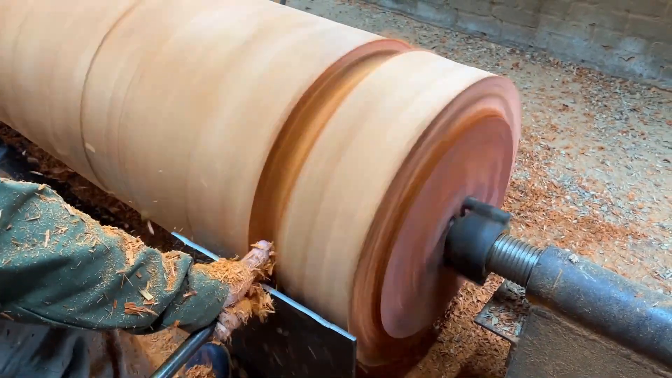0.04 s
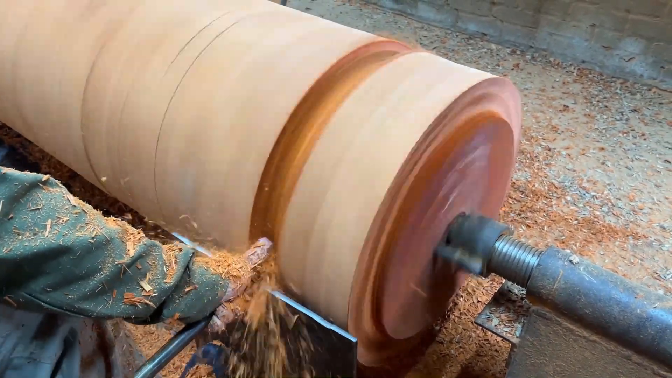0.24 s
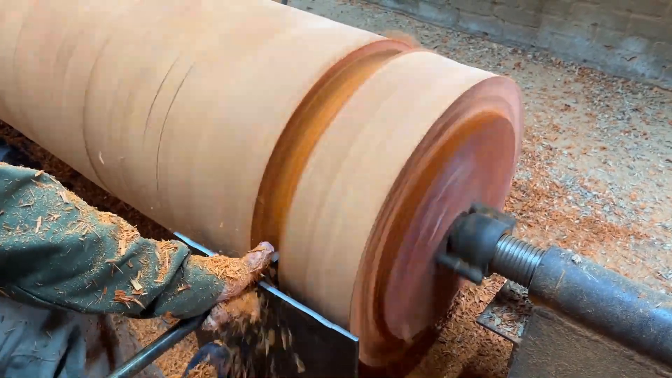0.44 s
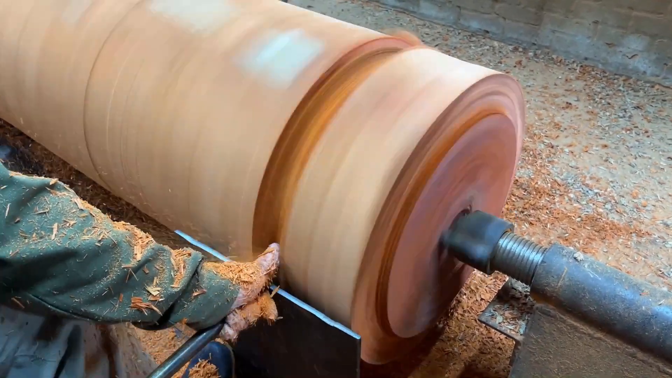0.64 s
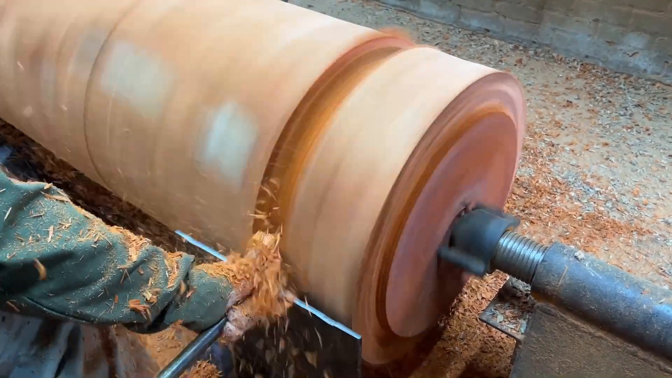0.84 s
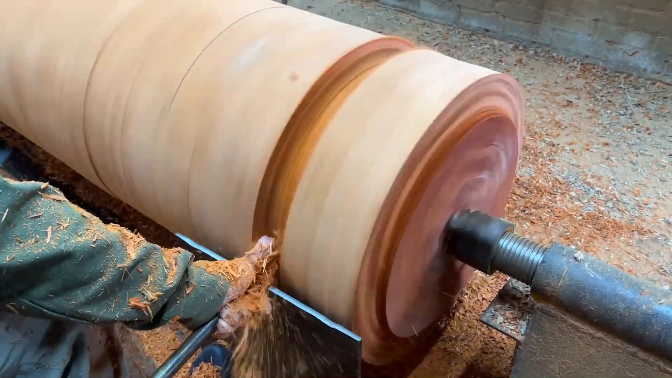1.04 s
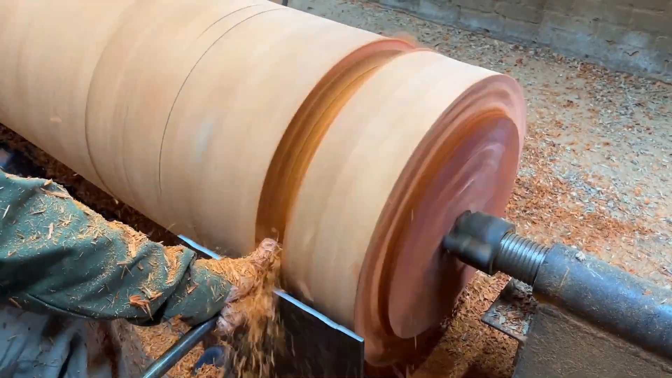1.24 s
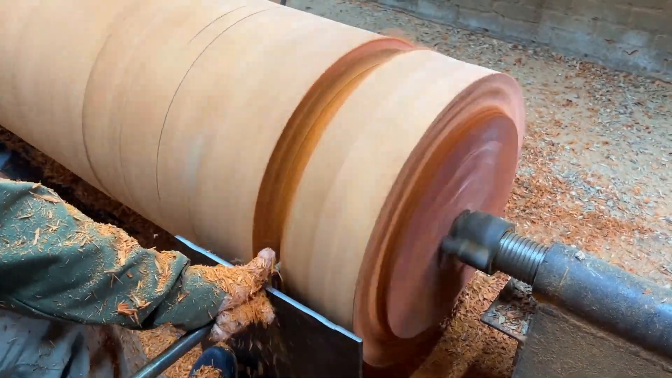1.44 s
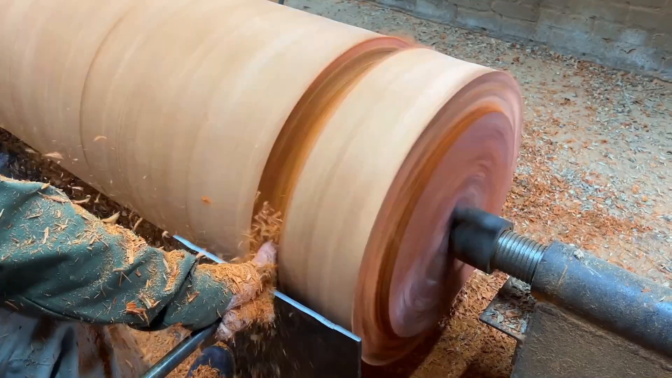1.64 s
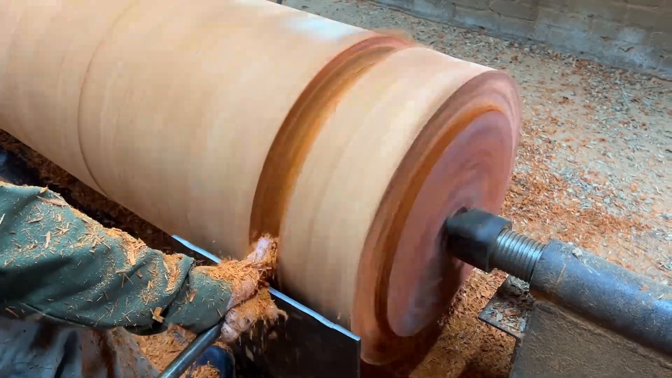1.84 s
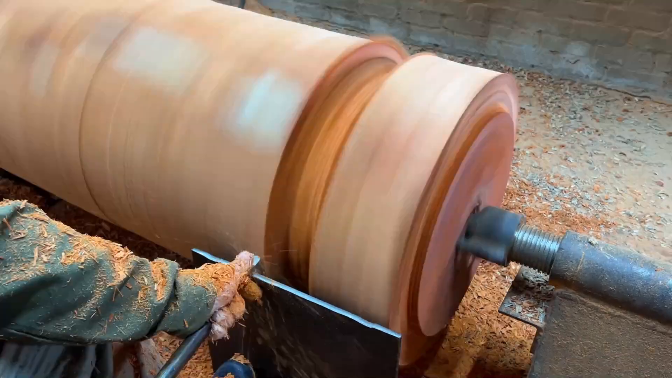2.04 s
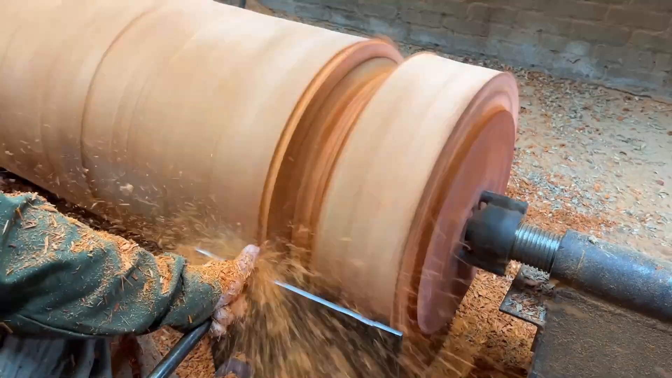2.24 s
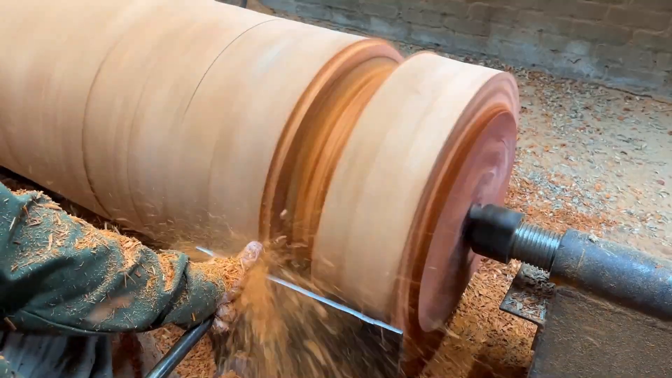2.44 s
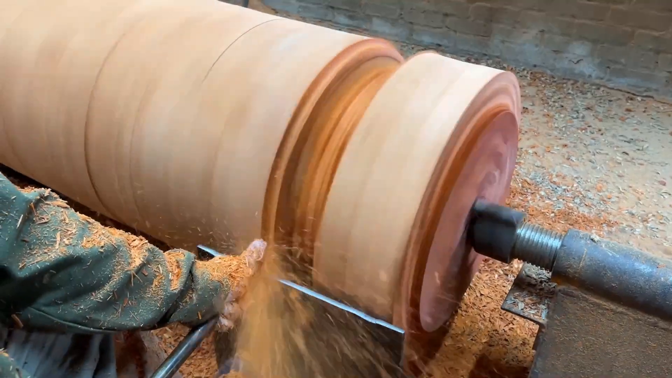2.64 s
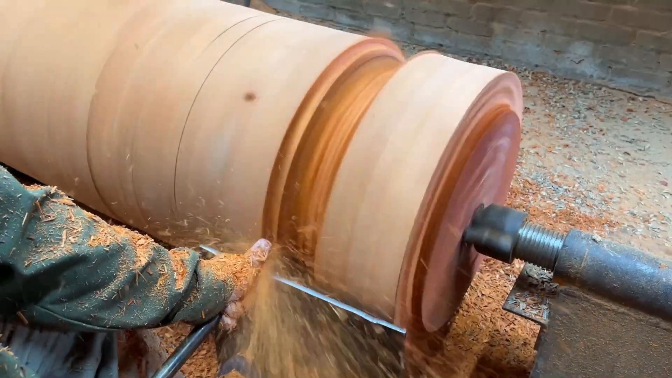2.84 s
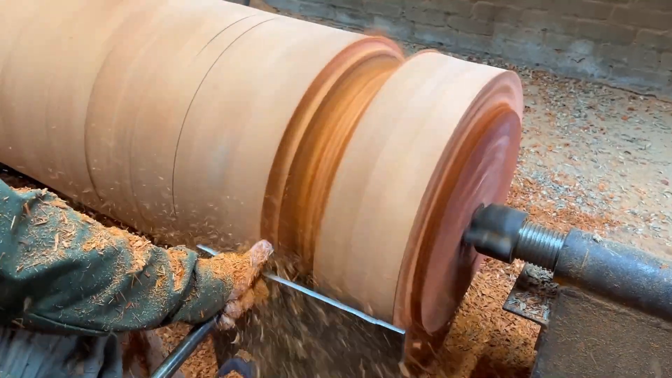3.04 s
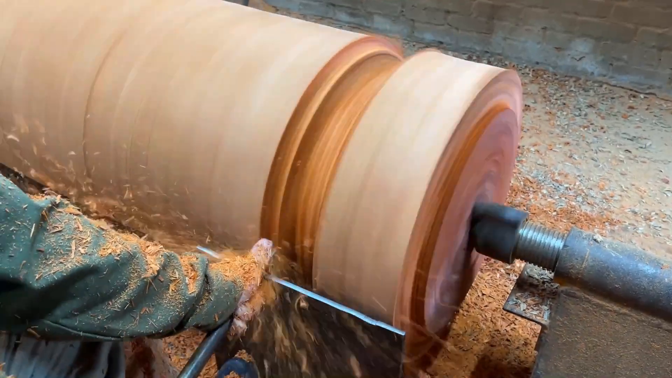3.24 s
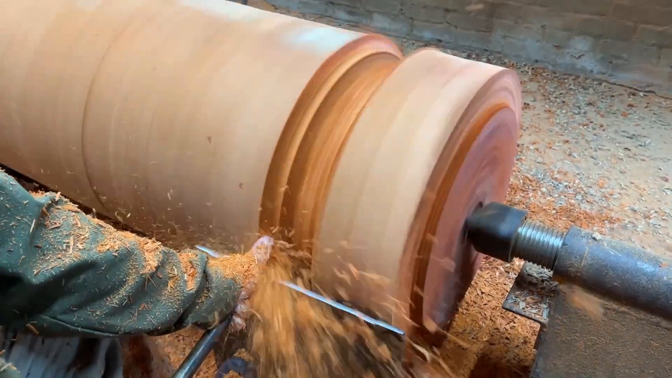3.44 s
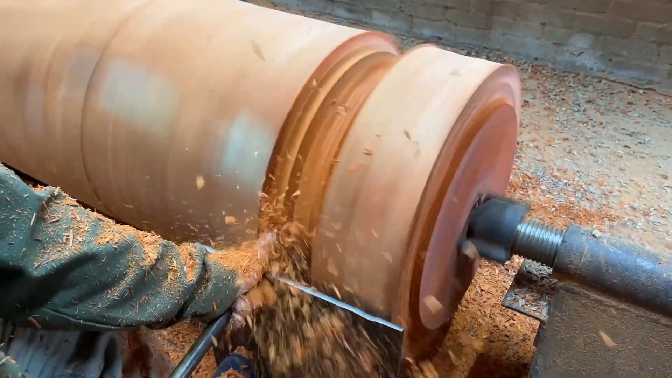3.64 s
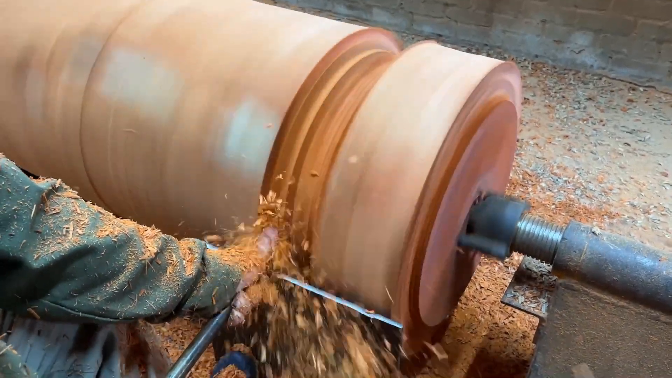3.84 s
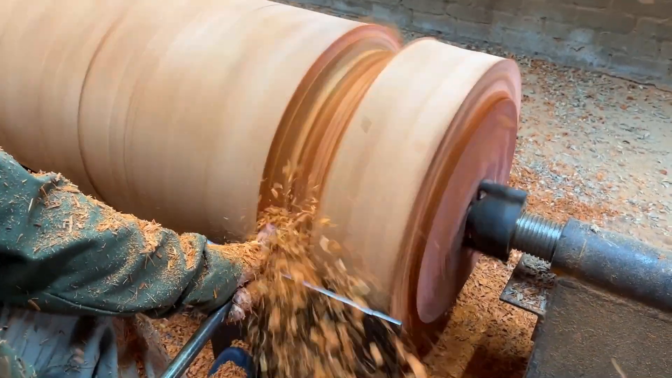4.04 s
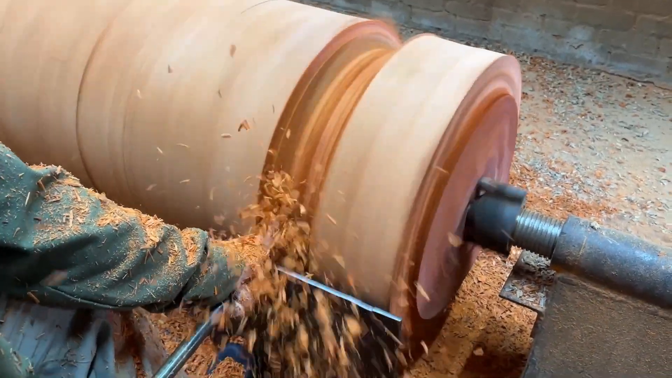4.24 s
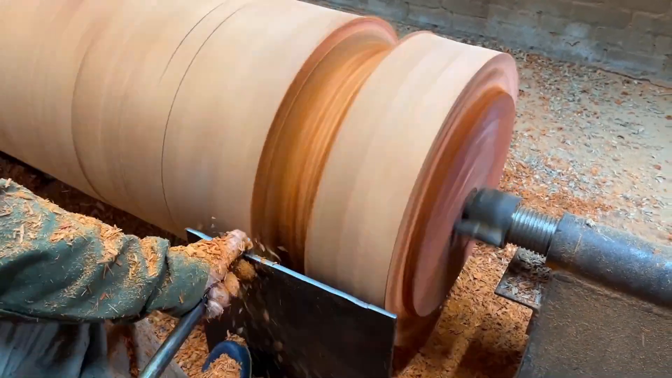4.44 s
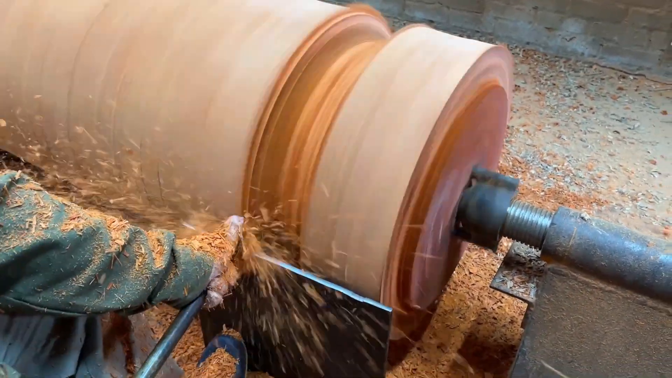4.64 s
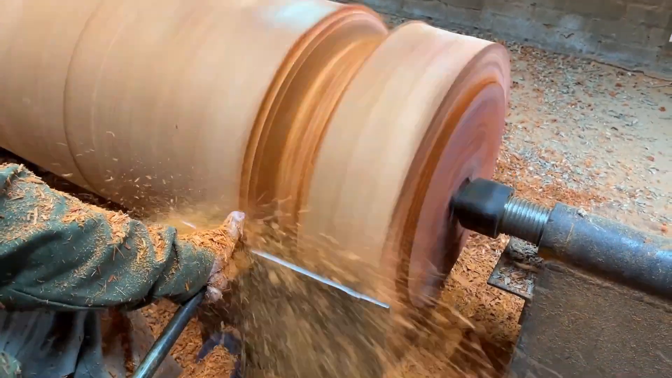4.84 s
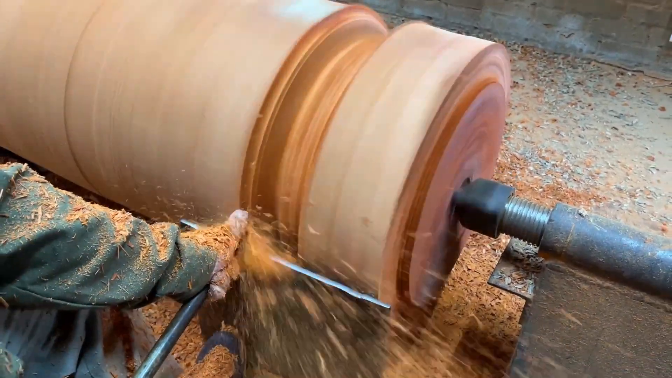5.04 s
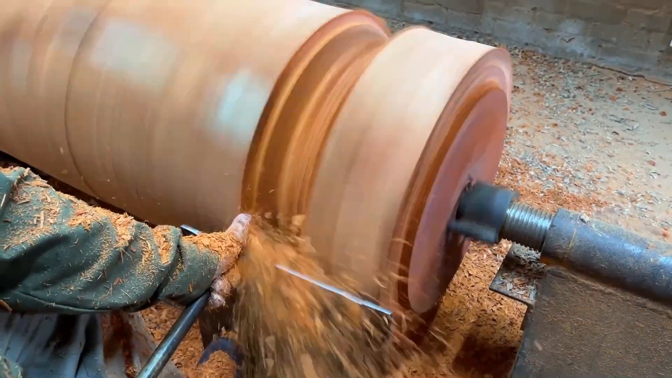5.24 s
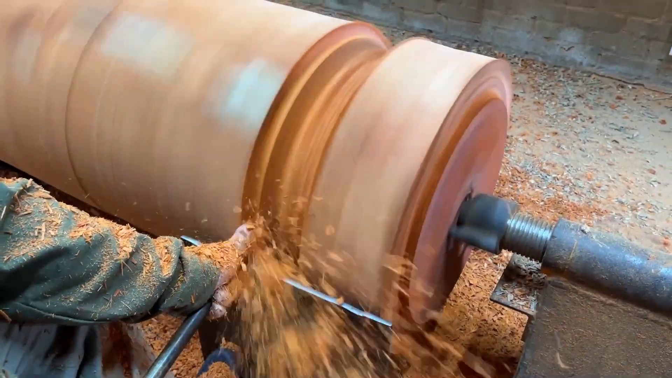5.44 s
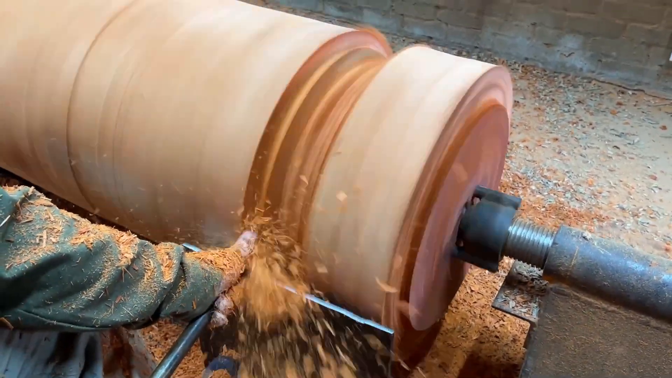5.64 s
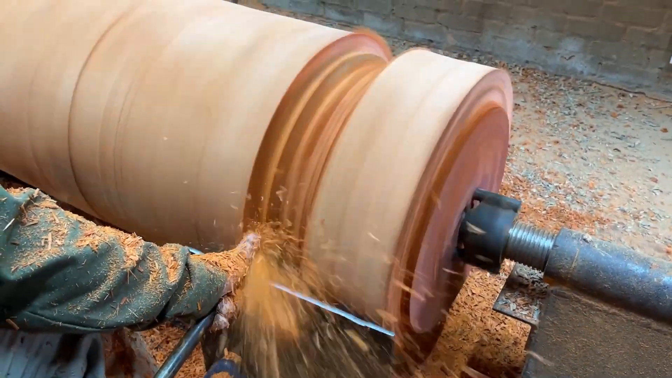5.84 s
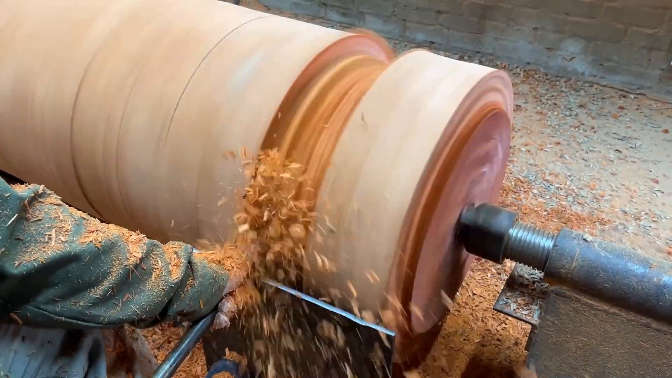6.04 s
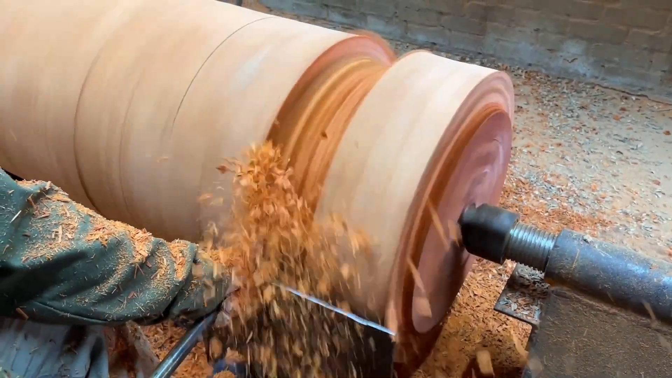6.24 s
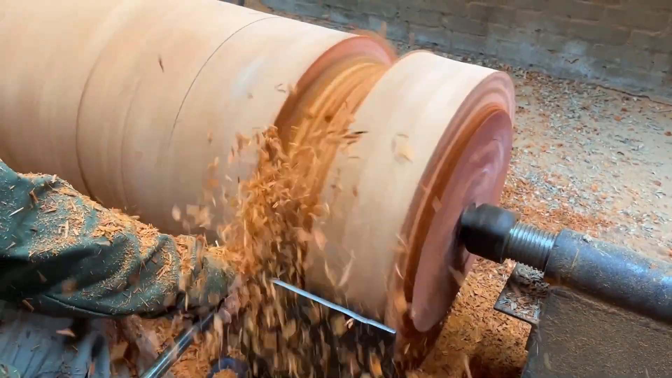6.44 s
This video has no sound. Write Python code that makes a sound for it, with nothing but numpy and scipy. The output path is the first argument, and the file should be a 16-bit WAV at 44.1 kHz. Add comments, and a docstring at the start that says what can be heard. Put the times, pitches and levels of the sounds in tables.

```python
"""A steel tool cuts a groove in a big log spinning on a lathe, heard from close by in a workshop.
Over the rumble of the lathe come five short, rough bites, with knocks and thin squeals from the bevel.
The level dips briefly. Three long cuts follow, the shaving's hiss falling in pitch as it widens.
All along, tearing fibres ring the tool and the log, and the cut throbs as the end grain comes round."""
import sys
import numpy as np
from scipy import signal
from scipy.fft import rfft, irfft, next_fast_len
from scipy.io import wavfile
from scipy.ndimage import uniform_filter1d

SR = 44100
rng = np.random.default_rng(int(sys.argv[2]) if len(sys.argv) > 2 else 0)


def generate_wav(signal):
    """Clip the signal to [-1, 1] and save it as 16-bit WAV at the path in sys.argv[1]."""
    frames = np.transpose(np.atleast_2d(signal))
    scaled = np.clip(frames, -1, 1) * 32767
    pcm = np.round(scaled).astype(np.int16)
    wavfile.write(sys.argv[1], SR, pcm)


N = 287091
TIME = np.arange(N) / SR
SIZE = next_fast_len(N + SR // 2)
FREQS = np.maximum(np.arange(SIZE // 2 + 1) * SR / SIZE, 1)

# tone of the room's scattered tail: (frequency [Hz], level [dB])
ROOM_EQ = [(60, -15), (300, -19), (700, -7), (1400, -15.5), (3000, -3.5), (6000, -6), (15000, -6.5)]
# stereo image: (frequency [Hz], left phase lead [rad], left over right [dB])
STEREO_IMAGE = [(60, -1.05, 0), (304, -0.13, -2.5), (690, -0.49, 0), (1530, -0.76, -1.5), (2600, -1.16, 1),
                (5440, 2.1, 1), (8450, 1.16, 0.5), (9900, 1.61, 1.5), (12800, 1.25, -1), (13400, -1.6, 2)]
# bearing rumble: (frequency [Hz], level [dB])
LATHE_EQ = [(25, -25), (70, -19), (130, -2), (190, -1), (350, -2), (700, -4), (1300, -4), (2500, -9.5),
            (5000, -12.5), (6000, -16), (16000, -31)]
# tempo of the throb: (time [s], end-grain passes [1/s])
PASS_RATE = [(0, 16.2), (1.5, 16.2), (1.8, 15.45), (3.05, 15.45), (3.3, 16.25), (3.9, 15.6), (4.8, 15.45)]
# the rubbing bevel sings: (start [s], end [s], pitch [Hz], width [Hz], level [dB])
BEVEL_SQUEALS = [(0, .62, 2863, 10, -51), (.79, 1.01, 2863, 10, -45), (.98, 1.3, 2863, 8, -49),
                 (1.52, 2.11, 2863, 8, -47), (1.05, 1.2, 5350, 60, -48), (1.44, 1.62, 5400, 50, -47),
                 (1.85, 2.02, 4020, 40, -46), (2.98, 3.19, 2830, 30, -49), (3.1, 3.19, 4500, 30, -54),
                 (3.1, 3.19, 7000, 50, -55), (3.235, 3.33, 4550, 50, -39), (3.24, 3.33, 7050, 150, -37.5),
                 (3.49, 3.63, 2795, 26, -40), (3.64, 3.71, 2795, 26, -40), (3.73, 3.81, 2795, 26, -41),
                 (3.89, 4.02, 2795, 26, -40), (4.03, 4.44, 2795, 35, -45), (6.05, 6.5, 2795, 35, -44),
                 (4.2, 4.45, 5550, 350, -39), (4.41, 4.54, 5370, 25, -50), (4.43, 4.53, 4480, 30, -55)]
# the tool knocks on the log: (time [s], peak [dB])
TOOL_KNOCKS = [(0.367, -61), (0.723, -34), (0.897, -29.5), (0.983, -24.5), (0.992, -30), (1.033, -34),
               (1.147, -35), (1.711, -52), (1.779, -27), (1.785, -48), (1.828, -47), (2.059, -30),
               (2.073, -39), (2.087, -35)]
# the log's low boom and midrange rasp: (pitch [Hz], width [Hz], level [dB])
LOG_BOOM_MODES = [(239, 10, -8), (309, 26, 7.5), (360, 15, 2)]
LOG_RASP_MODES = [(803, 27, -12.5), (1185, 75, 2.5), (1332, 53, 8.5), (1544, 53, -3.5), (2015, 50, -5)]
# broad woody noise under the boom: (frequency [Hz], level [dB])
LOG_EQ = [(25, -16), (55, -32), (90, -11.5), (160, -3.5), (300, 7), (550, -5.5), (900, 2.5), (2000, -4),
          (6000, -63)]
# hard spots in the wood accent the rasp: (time [s], boost [dB])
RASP_ACCENTS = [(.42, 4), (1.41, 7), (3.445, 14.5), (5.378, 11), (5.511, 12.5), (5.578, 8)]
# the tool's ring in bites and in long cuts: (pitch [Hz], width [Hz], level over the tearing [dB])
TOOL_BITE_MODES = [(2863, 22, 9), (3430, 160, 5), (3690, 50, 2), (4010, 110, 4), (5400, 200, 0),
                   (5940, 170, 1), (6440, 55, 0), (8250, 200, -3), (8740, 150, -1), (9950, 150, 0),
                   (13250, 100, 0), (14250, 200, -1)]
TOOL_CUT_MODES = [(2790, 80, -2), (3880, 220, -2), (4700, 150, -7), (6480, 130, -4), (7200, 200, -4),
                  (8010, 80, 1), (8805, 80, 2), (9447, 45, -3), (9620, 45, -3), (10460, 160, -2),
                  (12439, 60, 1), (12908, 45, -4), (13249, 65, 9), (13642, 45, -4), (14012, 45, -6),
                  (14919, 45, -3), (15343, 45, -5)]
# tone of the tearing in bites and in long cuts: (frequency [Hz], level [dB])
BITE_EQ = [(40, -5.5), (150, -8), (500, -4.5), (1000, -11), (2500, -1.5), (3500, 3), (4600, -1.5),
           (6000, 6), (7500, 8), (9500, 7), (12000, 6.5), (16000, 0)]
CUT_EQ = [(40, -13), (150, -14.5), (500, -10), (1000, -13.5), (2400, -9), (3500, -9), (4600, -5.5),
          (6000, -1.5), (7500, -7.5), (9500, -7), (12000, -3.5), (16000, -4.5)]
# short bites: (entry [s], deepest point [s], rasp peak [s], exit [s], attack [dB/s],
# tearing [dB], rasp [dB], boom [dB], shaving's hiss [dB], coarse chips [dB])
SHORT_BITES = [(-.2, -0.004, 0.089, 0.11, 500, -24.5, -43.5, -41.5, 12, -17),
               (0.195, 0.45, 0.56, 0.53, 1000, -26, -31, -40.5, -24, 11.5),
               (0.678, 0.934, 0.94, 1.005, 500, -22, -35.5, -40.5, 3, -18),
               (1.09, 1.198, 1.41, 1.479, 380, -23.5, -32.5, -39, 9, 15),
               (1.57, 1.778, 1.75, 1.965, 350, -23, -33.5, -37.5, 13, 15)]
# long cuts: (entry [s], exit [s], attack [dB/s], shaving's first width [0-1], last width [0-1],
# growth curve [exponent], rasp [dB], boom [dB])
LONG_CUTS = [(2.175, 3.105, 444, 0.04, 0.31, 2.24, -42.5, -49),
             (3.254, 4.414, 1402, 0.28, 0.94, 0.66, -42, -49),
             (4.596, 6.513, 950, .03, 0.96, 1.205, -43.5, -50)]
# push on the tool, one envelope per long cut: (time [s], tearing level [dB])
PUSH_ENVELOPES = [
    [(2.18, -33), (2.306, -32), (2.522, -29.5), (2.532, -26.5), (2.818, -26), (2.828, -27.5),
     (3.084, -25.5), (3.09, -29)],
    [(3.26, -26.5), (3.308, -24.5), (3.348, -31.5), (3.416, -25.5), (3.938, -26.5), (4.108, -28.5),
     (4.268, -25.5), (4.41, -28.5)],
    [(4.61, -33), (4.81, -27.5), (5.114, -24.5), (5.44, -28), (5.562, -25), (5.994, -30.5), (6.026, -27),
     (6.5, -28.5)],
]

# the shaving's resonances sweep down: (pitch when narrowest [Hz], pitch when widest [Hz])
LOWER_HZ, UPPER_HZ, COARSE_HZ = (11330, 7760), (16820, 7840), (9900, 4910)
# each speaks best at one width: (best width [0-1], level there [dB], loss at 0.5 off that width [dB])
LOWER_VOICE, UPPER_VOICE, COARSE_VOICE = (0.68, 7.86, 11.5), (0.14, 13.2, 77), (0.95, 17, 39)
CUTOFF_HZ = 15850


def from_db(db):
    """Decibels to gain."""
    return 10 ** (np.asarray(db) / 20)


def rms_one(x):
    """Scale to unit power."""
    return x / np.sqrt(np.mean(np.abs(x) ** 2) + 1e-20)


def envelope(rows):
    """A breakpoint curve at every sample."""
    return np.interp(TIME, *np.transpose(rows))


def in_frequency(rows):
    """Each column of a table at every frequency."""
    hz, *columns = np.transpose(rows)
    return [np.interp(np.log(FREQS), np.log(hz), c) for c in columns]


def colour(eq):
    """Frequency response of an EQ curve."""
    return from_db(in_frequency(eq)[0])


def filtered(x, response):
    """Pass a sound through a frequency response."""
    return irfft(rfft(x, SIZE) * response, SIZE)[..., :N]


def resonance(hz, width_hz):
    """Response of one damped mode, 1 at its peak."""
    return 1 / (1 + 1j * (FREQS ** 2 - hz ** 2) / (FREQS * width_hz))


def body(modes):
    """Response of a bank of modes."""
    return sum(from_db(db) * resonance(hz, width) for hz, width, db in modes)


def drift(rate_hz):
    """Smooth random modulation at unit power."""
    return rms_one(filtered(rng.standard_normal(N), 1 / (1 + (FREQS / rate_hz) ** 2)))


def levelled(x, window=2200):
    """Trim the top off a noise and ride its gain to hold unit power."""
    x = filtered(x, FREQS < CUTOFF_HZ)
    return x / np.sqrt(uniform_filter1d(x * x, window) + 1e-12)


def workshop(x, t60=0.071):
    """Direct sound reaches the two ears out of step; near surfaces add a short scattered tail."""
    lead, balance_db = in_frequency(STEREO_IMAGE)
    sides = np.array([[1], [-1]])
    decay = from_db(-60 * np.minimum(TIME / t60, 4))
    tail = rng.standard_normal((2, N)) * decay * (TIME > .002)
    response = np.exp(.5j * sides * lead) + colour(ROOM_EQ) * rms_one(rfft(tail, SIZE))
    return filtered(x, response * from_db(sides * balance_db / 2))


def lathe():
    """The bed: bearings rumble and the motor hums."""
    hum = from_db(-6) * resonance(220, 18)
    noise = rng.standard_normal(N) + from_db(-15) * rng.standard_normal((2, N))
    return from_db(-52) * rms_one(filtered(noise, colour(LATHE_EQ) + hum))


def squeals():
    """Rubbing holds a steel mode in steady vibration; its pitch wavers within the mode's width."""
    out = np.zeros(N)
    for start, end, hz, width_hz, db in BEVEL_SQUEALS:
        span = slice(int(start * SR), int(end * SR))
        size = len(out[span])
        pole = np.exp((-np.pi * width_hz + 2j * np.pi * hz) / SR)
        ring = rms_one(signal.lfilter([1], [1, -pole], rng.standard_normal(SR)))
        held = ring.real / np.hypot(np.abs(ring), .4)  # soft limiting
        out[span] += from_db(db) * rms_one(held[-size:]) * signal.windows.tukey(size, .4)
    return out


def end_grain(width, boom_db, first_pass_s=.056):
    """End grain resists on each pass: a throb and a thump, strongest under a narrow shaving."""
    rate = envelope(PASS_RATE)
    passes = np.cumsum(rate) / SR - first_pass_s * rate[0]
    angle = 2 * np.pi * passes
    narrow = np.exp(-((width - 0.25) / 0.13) ** 2)
    pulse = np.cos(angle) + 0.18 * np.cos(2 * angle) - .1
    throb = (0.42 + 1.5 * narrow) * pulse
    triggers = np.diff(np.floor(passes), prepend=np.floor(passes[0]))
    thumps = triggers * from_db(boom_db + 10 * narrow + 2 * drift(7.2))
    return throb, thumps


def knocks(thumps):
    """The tool bounces on high spots and on the end grain; each soft blow thumps the log's low modes."""
    blows = thumps.copy()
    for s, db in TOOL_KNOCKS:
        blows[int(s * SR)] += from_db(db)
    low_modes = body(LOG_BOOM_MODES) + from_db(9) * resonance(280, 91)
    response = low_modes * resonance(220, 330)
    return filtered(blows, response / np.abs(irfft(response)).max())


def fractures(per_s, spread_db, sides_db):
    """Fibres snap at random, most faintly and a few hard, in the centre, left and right."""
    sizes = from_db(spread_db * np.minimum(rng.exponential(1, (3, N)), 5))
    snaps = sizes * rng.choice([-1, 1], (3, N)) * (rng.random((3, N)) < per_s / SR)
    return rms_one(snaps[0] + from_db(sides_db) * snaps[1:])


def log_body(clumps, rasp_db, boom_db):
    """The cutting force shakes the log: a midrange rasp over a low boom."""
    shake = fractures(per_s=5000, spread_db=2.5, sides_db=-9.5) * clumps
    accent_db = sum(db * np.exp(-((TIME - s) / 0.0079) ** 2) for s, db in RASP_ACCENTS)
    rasp = levelled(filtered(shake, body(LOG_RASP_MODES)))
    boom = levelled(filtered(shake, body(LOG_BOOM_MODES) + from_db(-5) * colour(LOG_EQ)))
    return rasp * from_db(rasp_db + accent_db - 2) + boom * from_db(boom_db + 1)


def contact(enters, leaves, attack_db_per_s, release_db_per_s=500, log_share=.75):
    """The edge sinks in, holds and is drawn out: the tool's fade and the log's gentler one, in dB."""
    attack_db = -attack_db_per_s * np.maximum(enters - TIME, 0)
    fade_db = attack_db - release_db_per_s * np.maximum(TIME - leaves, 0)
    return fade_db, log_share * fade_db


def bite(enters, deepest, rasp_peak, leaves, attack, tear_db, rasp_db, boom_db, hiss_db, coarse_db):
    """A short bite swells to its deepest point and eases; its shaving is wide throughout."""
    fade_db, log_fade_db = contact(enters, leaves, attack)
    shallow = np.interp(TIME, [enters, deepest, leaves], [1, 0, 1]) ** 1.33
    smooth = np.interp(TIME, [enters, rasp_peak, leaves], [1, 0, 1]) ** 2.1
    rub_tear_db, rub_boom_db = -54, -51.5  # the bevel still rubs between bites
    return dict(
        contact_db=fade_db, width=0.85,
        tear_db=np.maximum(tear_db - 12 * shallow + fade_db, rub_tear_db),
        rasp_db=rasp_db - 13.5 * smooth + log_fade_db,
        boom_db=np.maximum(boom_db - 6 * shallow + log_fade_db, rub_boom_db),
        lower_db=hiss_db - 14 * shallow, upper_db=-36, coarse_db=coarse_db)


def voice_db(width, best_width, top_db, loss_db):
    """A resonance of the shaving fades on either side of its best width."""
    return top_db - loss_db * (2 * (width - best_width)) ** 2


def long_cut(push, enters, leaves, attack, first_width, last_width, curve, rasp_db, boom_db):
    """In a long cut the shaving widens and recolours the hiss; the rasp grows and the boom thins."""
    fade_db, log_fade_db = contact(enters, leaves, attack)
    progress = np.interp(TIME, [enters, leaves], [0, 1])
    width = first_width + (last_width - first_width) * progress ** curve
    return dict(
        contact_db=fade_db, width=width,
        tear_db=envelope(push) + fade_db,
        rasp_db=rasp_db + 5 * (progress - .5) + log_fade_db,
        boom_db=boom_db - (width - .5) + log_fade_db,
        lower_db=voice_db(width, *LOWER_VOICE),
        upper_db=voice_db(width, *UPPER_VOICE),
        coarse_db=voice_db(width, *COARSE_VOICE))


def tool_strokes():
    """At each instant the stroke in firmest contact sets all the controls."""
    strokes = [bite(*row) for row in SHORT_BITES]
    strokes += [long_cut(push, *row) for push, row in zip(PUSH_ENVELOPES, LONG_CUTS)]
    firmest = np.argmax([stroke["contact_db"] for stroke in strokes], axis=0)
    return {name: np.choose(firmest, [stroke[name] for stroke in strokes]) for name in strokes[0]}


def shaving_mode(snaps, width, hz_range, band_hz, block=128):
    """One resonance of the shaving: a band-pass that sweeps down as the shaving widens."""
    narrow_hz, wide_hz = hz_range
    hz = narrow_hz * (wide_hz / narrow_hz) ** width
    radius = np.exp(-np.pi * band_hz / SR)
    out, state = np.zeros((2, N)), np.zeros((2, 2))
    for i in range(0, N, block):
        poles = [1, -2 * radius * np.cos(2 * np.pi * hz[i] / SR), radius ** 2]
        out[:, i:i + block], state = signal.lfilter([1, 0, -1], poles, snaps[:, i:i + block], zi=state)
    return out * (1 - radius ** 2) / 2


def shaving(snaps, stroke):
    """The curling shaving hisses in two bands; a wide cut breaks off thick chips that crackle lower."""
    width = stroke["width"]
    lower = from_db(stroke["lower_db"]) * shaving_mode(snaps, width, LOWER_HZ, band_hz=1000)
    upper = from_db(stroke["upper_db"]) * shaving_mode(snaps, width, UPPER_HZ, band_hz=900)
    chips = from_db(-10) * shaving_mode(snaps, width, COARSE_HZ, band_hz=830)
    chips += from_db(-16) * filtered(snaps, resonance(3880, 560))
    return lower + upper + from_db(stroke["coarse_db"]) * chips


def tearing(clumps, stroke, throb_db, regrip_s=2.097):
    """Snapping fibres ring the shaving, then the steel tool, whose grip changes for the long cuts."""
    snaps = fractures(per_s=18000, spread_db=2.7, sides_db=-5) * clumps
    force = from_db(stroke["tear_db"] + throb_db + 1.25 * drift(6.9))
    long_grip = TIME > regrip_s
    noise = np.where(long_grip, filtered(snaps, colour(CUT_EQ)), filtered(snaps, colour(BITE_EQ)))
    edge = levelled(noise + shaving(snaps, stroke)) * force
    bites = filtered(edge * ~long_grip, rms_one(1 + body(TOOL_BITE_MODES)))
    cuts = filtered(edge * long_grip, rms_one(1 + body(TOOL_CUT_MODES)))
    return from_db(1.4) * bites + from_db(1) * cuts


def scene():
    """One throbbing, clumpy cutting force drives tool and log; the boom throbs deepest."""
    stroke = tool_strokes()
    throb, thumps = end_grain(stroke["width"], stroke["boom_db"])
    clumps = from_db(1.6 * drift(300))
    tool = tearing(clumps, stroke, throb_db=.5 * throb)
    wood = log_body(clumps, stroke["rasp_db"] + 2 * throb, stroke["boom_db"] + 3.6 * throb)
    return workshop(tool + wood + squeals() + knocks(thumps) + lathe())


def record(dry):
    """The level dips for an instant before the long cuts; a steep low-pass trims the top."""
    dip = (TIME > 2.090) & (TIME < 2.104)
    low_pass = signal.ellip(12, .2, 80, CUTOFF_HZ, fs=SR, output="sos")
    return signal.sosfilt(low_pass, dry * from_db(-22 * dip))


dry = scene()
out = record(dry)
generate_wav(out)
```